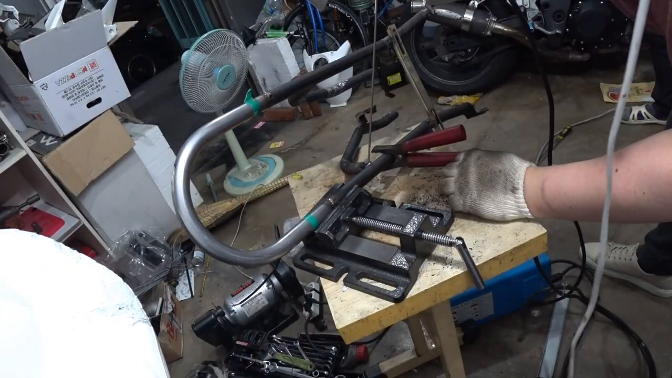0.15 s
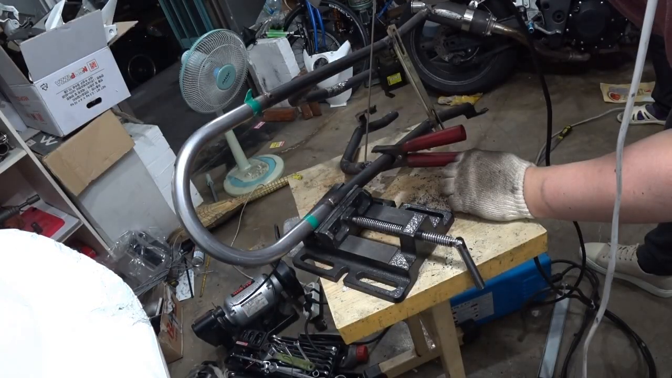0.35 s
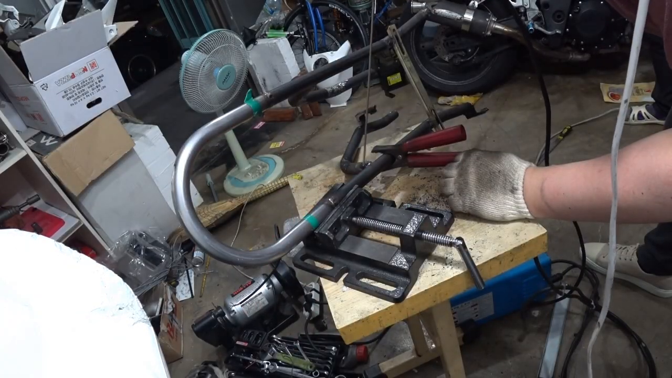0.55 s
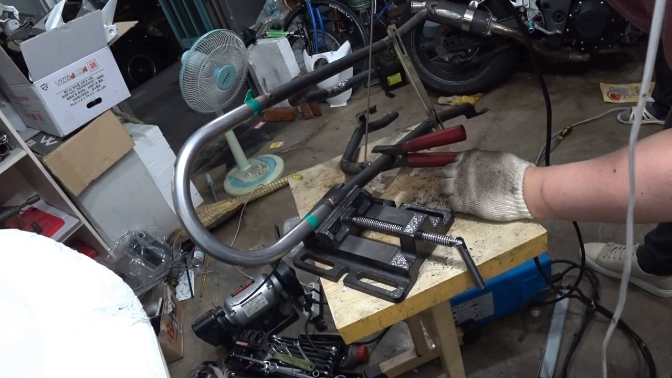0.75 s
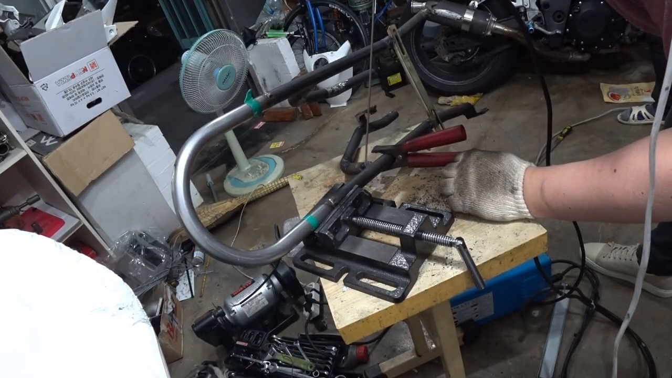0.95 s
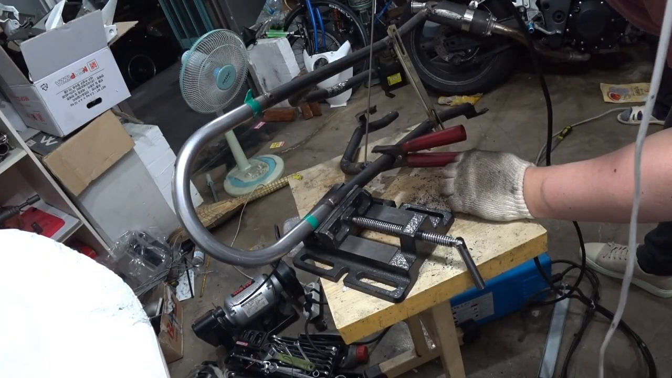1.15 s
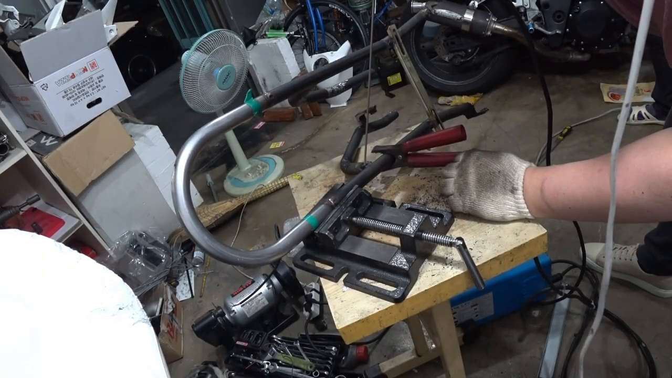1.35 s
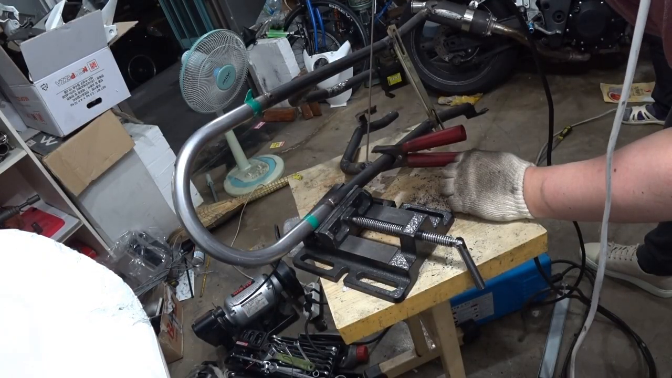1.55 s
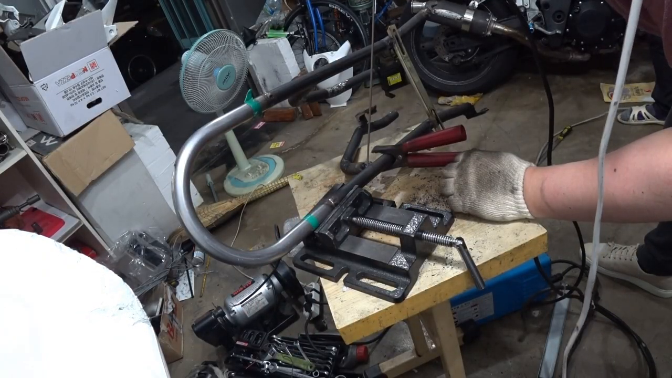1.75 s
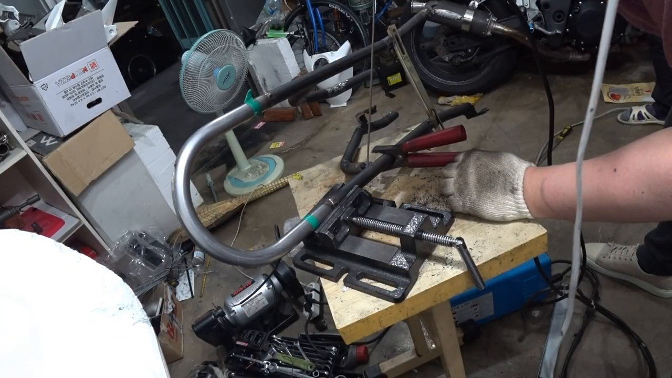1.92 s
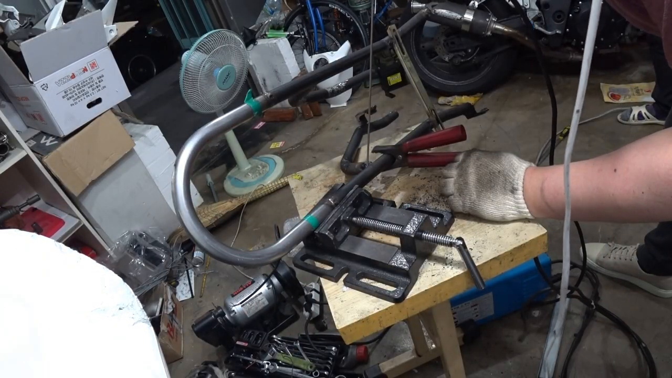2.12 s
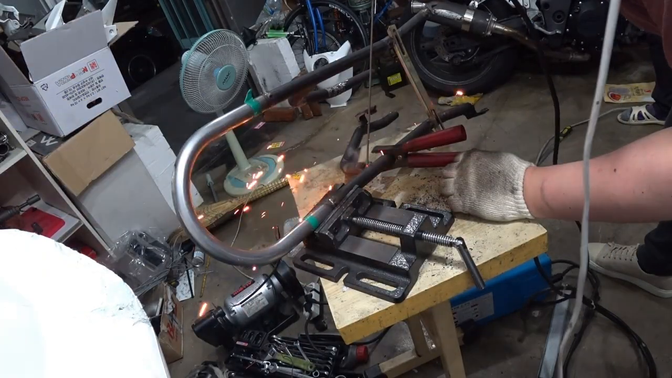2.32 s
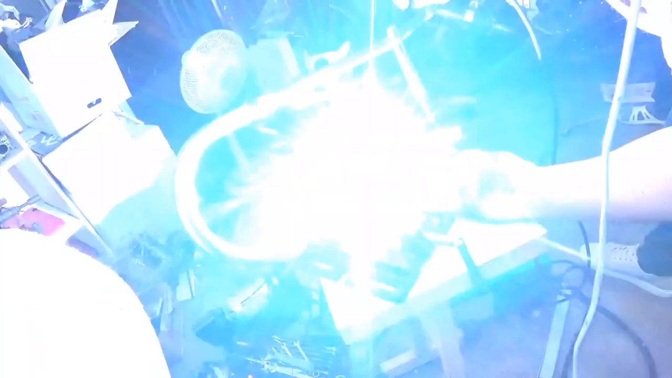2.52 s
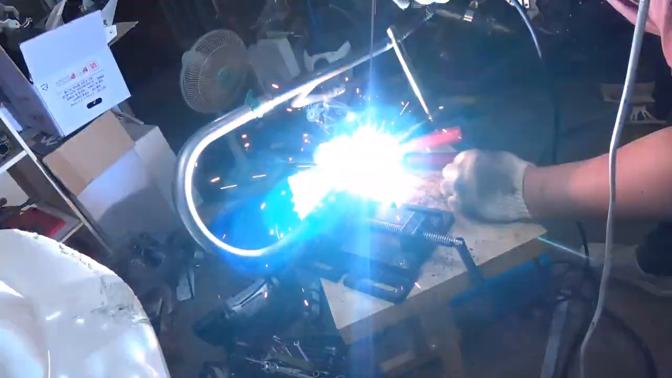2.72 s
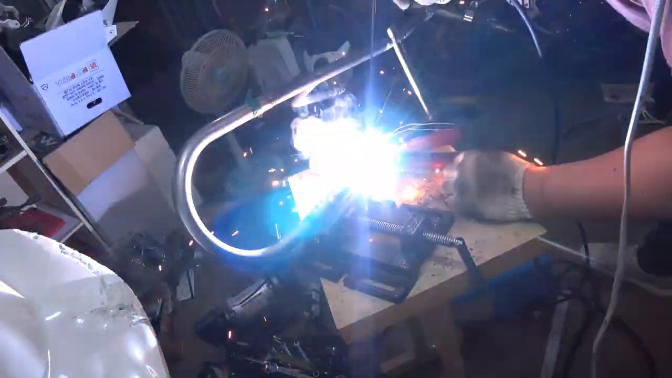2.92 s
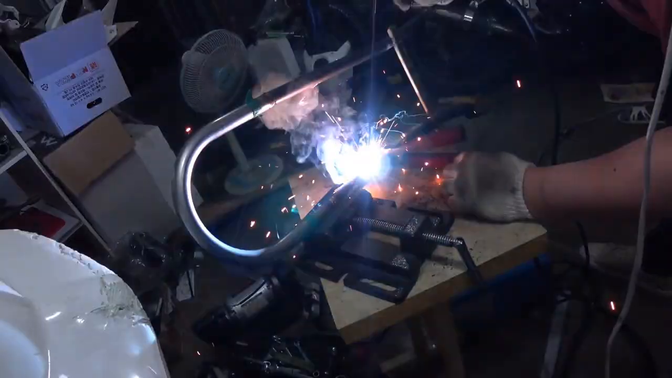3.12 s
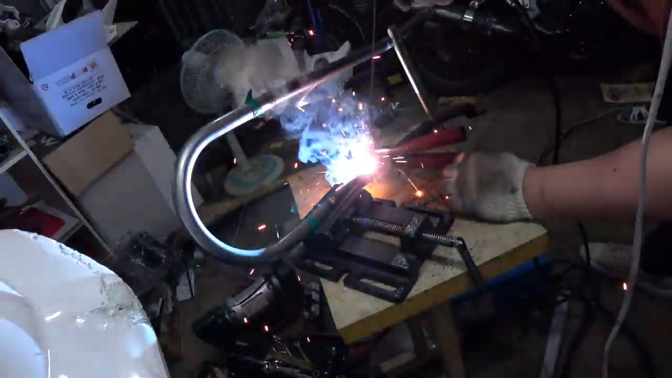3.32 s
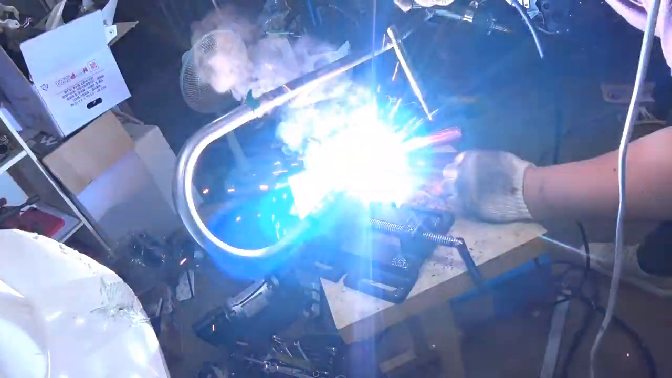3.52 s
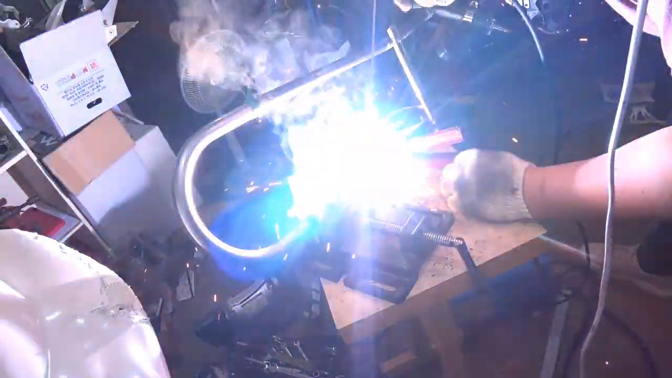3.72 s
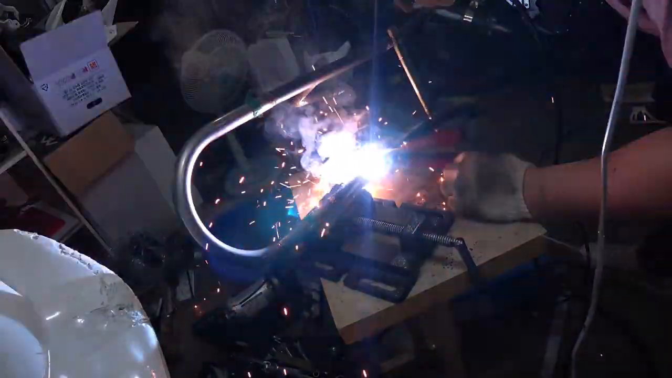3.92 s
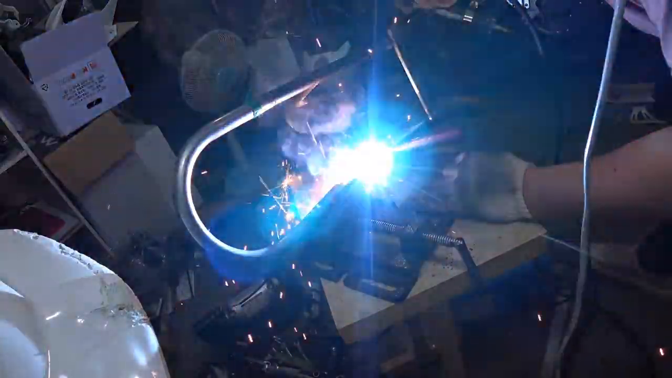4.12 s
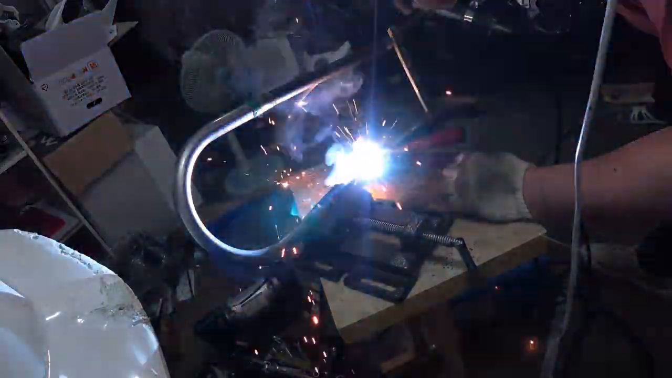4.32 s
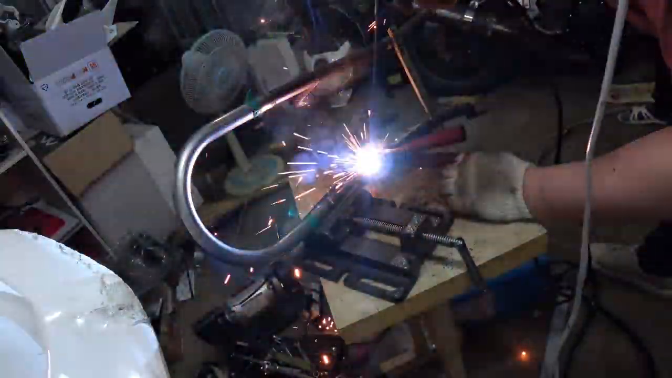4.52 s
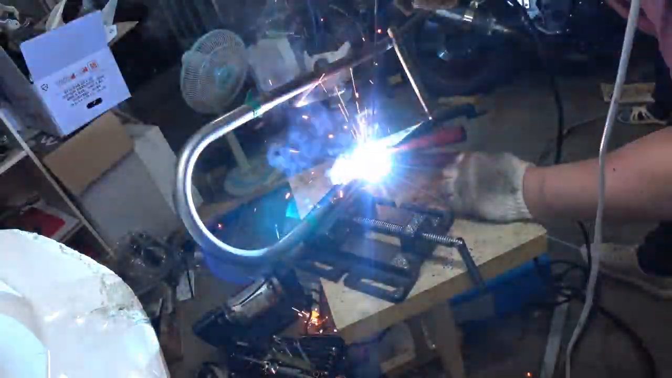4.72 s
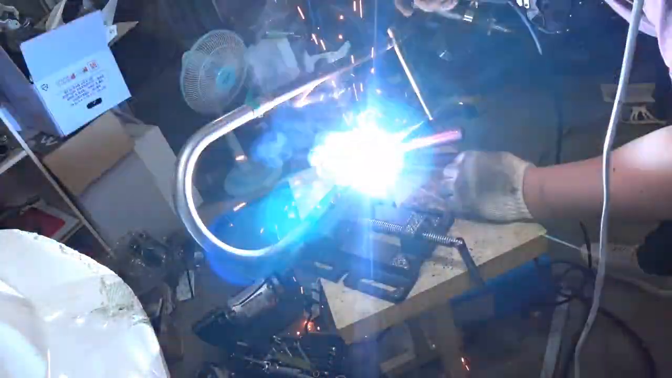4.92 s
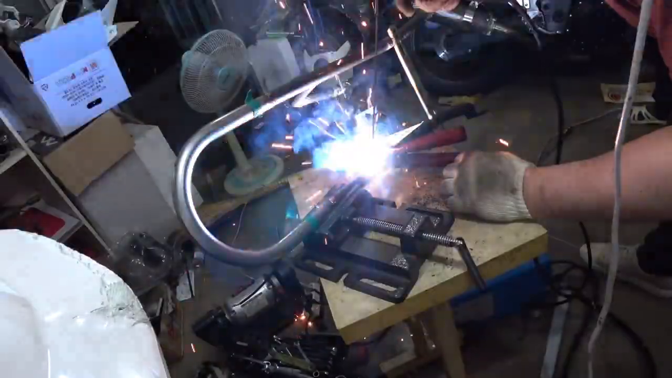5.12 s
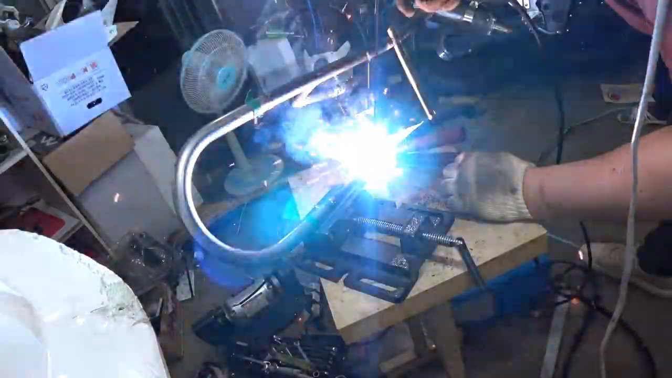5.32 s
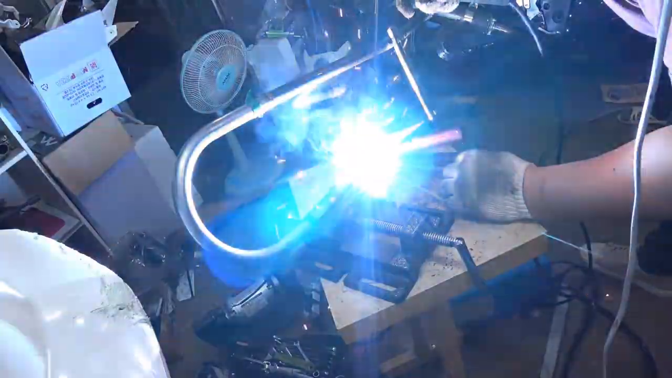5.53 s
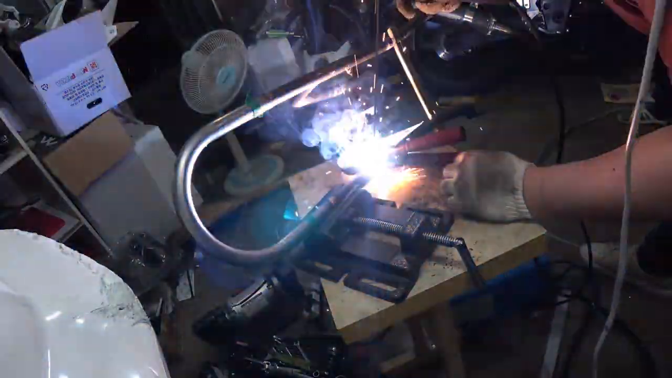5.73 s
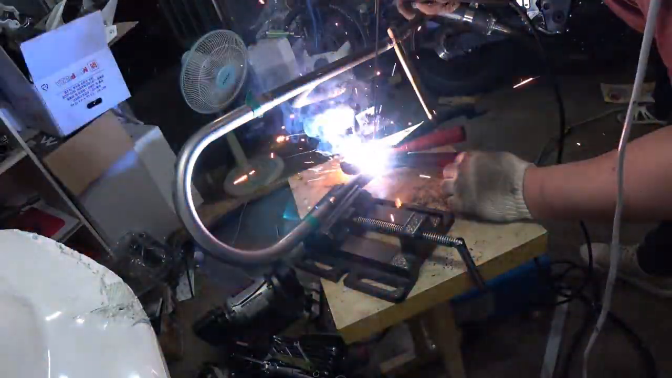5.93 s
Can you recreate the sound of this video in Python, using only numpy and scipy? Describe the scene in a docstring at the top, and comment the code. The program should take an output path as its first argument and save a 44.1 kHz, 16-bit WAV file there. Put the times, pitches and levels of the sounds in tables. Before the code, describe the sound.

A welding rod ticks against steel, then the arc catches and crackles densely in a small workshop, with the welder humming underneath.

```python
"""Stick welding on a steel tube in a small workshop, over the welding machine's fan and hum.
First the rod ticks and scratches on the tube, and rings after one knock. At 2.2 s the arc flashes briefly.
From 2.5 s it burns on: a dense sizzle of tiny sparks, soft pushes of hot gas, and loud snaps where
drops of metal short the gap. Near 4.45 s and 5 s it sputters, relighting in short rasps."""
import sys
import numpy as np
from scipy import signal
from scipy.fft import rfft, irfft
from scipy.io import wavfile

SR = 44100
rng = np.random.default_rng(int(sys.argv[2]) if len(sys.argv) > 2 else 0)


def bounce(signal):
    """Save signal as a 16-bit WAV file at the path given by the first command-line argument."""
    frames = np.transpose(np.atleast_2d(signal))
    limited = np.clip(frames, -1, 1)
    pcm = np.round(limited * 32767).astype(np.int16)
    wavfile.write(sys.argv[1], SR, pcm)


N = 267246
T = np.arange(N) / SR
HZ = np.fft.rfftfreq(N, 1 / SR)


# arc strength, first flash and steady burn: (time [s], sizzle [dB], roar [dB])
ARC_FLASH = [(2.2, -32.5, -51), (2.235, -33.5, -39), (2.272, -29.5, -49)]
ARC_BURN = [(2.5, -30, -44.5), (2.66, -29.5, -38), (2.81, -31.5, -38.5), (2.911, -32, -47),
            (2.98, -30.3, -39), (3.27, -35, -46.3), (3.39, -34, -42), (3.48, -27.3, -44), (3.6, -29.5, -41),
            (3.68, -25, -38), (3.77, -30.5, -37.5), (3.87, -25.5, -36), (3.93, -32.5, -47),
            (4.16, -30, -40), (4.39, -33, -43), (4.53, -31.5, -35.5), (4.65, -35, -48), (4.81, -34, -40.5),
            (4.94, -35, -48), (5.08, -34, -38), (5.21, -34.5, -47), (5.531, -27, -41), (5.74, -34, -41),
            (5.79, -26.5, -38), (5.93, -35.5, -42), (6.06, -31.5, -40.5)]
def sizzle(sparks_per_s=3000, pops_per_s=110, spread_db=3.5, hiss_db=-9.5, flutter_db=3, wander_db=1):
    """Tiny sparks and hiss, clumped by the restless arc, plus small pops; all scaled by its strength."""
    chance, size, noise = rng.random(N), rng.exponential(1, N), rng.standard_normal(N)
    sparks = (chance < sparks_per_s / SR) * amp(spread_db * np.minimum(size, 4)) * np.sign(noise)
    flutter = amp(flutter_db * drift(rate_hz=89))
    hiss = amp(hiss_db) * rng.standard_normal(N)
    roar, mid, fizz = unit_bands(at_weld((unit_rms(sparks) + hiss) * flutter))
    pop_onsets = (chance > 1 - pops_per_s / SR) * (0.5 + rng.random(N))
    pops = signal.lfilter([1], [1, -np.exp(-3000 / SR)], pop_onsets) * noise  # 1/3 ms decay
    _, pop_mid, pop_fizz = unit_bands(at_weld(pops))
    mid = mid + amp(-8.5) * pop_mid
    fizz = fizz + amp(-1.5) * pop_fizz
    flashing = (T >= ARC_FLASH[0][0]) & (T <= ARC_FLASH[-1][0])
    burning = T >= ARC_BURN[0][0]
    out = np.zeros(N)
    for strength, lit in ((ARC_FLASH, flashing), (ARC_BURN, burning)):
        sizzle_db, roar_db, fizz_db = arc_levels(strength)
        out += lit * (amp(roar_db - 2) * roar + amp(sizzle_db - 0.7) * mid + amp(fizz_db) * fizz)
    return out * amp(wander_db * drift(rate_hz=6.9))


SIZZLE_REF_DB, FIZZ_REF_DB = -32, -32.5
# fizz dips (fresh arc, biggest surge, after a sputter): (start [s], recovery [s], depth [dB])
FIZZ_DIPS = [(2.5, 0.22, -8.5), (3.66, 0.12, -5), (5.02, 0.064, -16)]
def arc_levels(strength, fizz_follow=0.54):
    """Sizzle, roar and fizz in dB over time; the fizz follows only part of each surge."""
    times_s, *columns = np.transpose(strength)
    sizzle_db, roar_db = (np.interp(T, times_s, column) for column in columns)
    dip_db = sum(depth_db * (T >= start_s) * np.exp(-((T - start_s) / recovery_s) ** 4)
                 for start_s, recovery_s, depth_db in FIZZ_DIPS)
    return sizzle_db, roar_db, FIZZ_REF_DB + fizz_follow * (sizzle_db - SIZZLE_REF_DB) + dip_db


# dry rod touches: (time [s], level [dB], brightness [dB])
ROD_TOUCHES = [(0.4988, -19, -0.5), (0.8196, -50, -2), (1.1395, -47, -7), (1.2809, -39, -16),
               (1.7878, -22.5, 3), (2.1421, -56, -6)]
# arc strikes and big drops: (time [s], level [dB], brightness [dB])
BIG_SNAPS = [(2.2009, -19, 6), (2.2684, -14.5, 4), (2.3226, -17, 6), (2.4996, -12, -2), (2.6072, -15.5, -7),
             (2.6724, -16, -1), (2.7407, -15, 1), (2.8266, -14, 8), (2.9341, -15.5, 5), (2.9936, -12.5, 3),
             (3.2837, -15, 7), (3.5979, -13.5, 5), (3.8071, -14, 11), (4.2866, -14.5, 8), (4.4128, -15, 8),
             (4.5642, -15, 6), (4.6226, -14, 6), (4.7468, -13.5, 6), (4.9238, -14, 6), (5.0515, -14.5, -2),
             (5.2764, -15, 8), (5.2881, -16, 8), (5.3552, -14.5, 6), (5.4182, -13.5, 4), (5.9228, -13.5, 8)]
def snaps(gain_db=0.7, tilt_db=-1.5):
    """Drops short the gap and burst with a crack; dry touches of the rod crack more cleanly."""
    out = np.zeros(N)
    for rows, scatter in ((ROD_TOUCHES, 0.15), (BIG_SNAPS, 0.9), (small_drops(), 0.9)):
        for time_s, level_db, bright_db in rows:
            add(out, time_s, amp(level_db + gain_db) * crack(bright_db + tilt_db, scatter, 0.0008))
    return at_weld(thin(out, cutoff_hz=2730, body_db=-5))


def small_drops(drops_per_s=26, base_db=-18, base_bright_db=4.5, fizz_follow=0.49, count=200):
    """Rows like BIG_SNAPS: drops at uneven intervals, louder with the fizz, duller as the arc surges."""
    sizzle_db, _, fizz_db = arc_levels(ARC_BURN)
    times_s = ARC_BURN[0][0] + (np.arange(count) + 2 * rng.random(count)) / drops_per_s
    size, tint_db = rng.standard_normal((2, count))
    level_db = base_db + 0.5 * size + fizz_follow * (np.interp(times_s, T, fizz_db) - FIZZ_REF_DB)
    surge_db = np.interp(times_s, T, sizzle_db) - SIZZLE_REF_DB
    bright_db = base_bright_db + tint_db - surge_db
    return [row for row in zip(times_s, level_db, bright_db) if row[0] < T[-1]]


# arc sputters: (start [s], end [s], first rate [Hz], last rate [Hz], level [dB])
SPUTTERS = [(4.443, 4.456, 800, 650, -27), (4.4559, 4.472, 480, 460, -17), (4.4725, 4.489, 570, 1000, -17),
            (5.0115, 5.0145, 900, 900, -14)]
def rasps(gain_db=-2, first_bright_db=-12, dulling_db_per_s=330, jitter=0.076):
    """The arc relights in quick succession: clean cracks at a gliding rate, growing duller."""
    out = np.zeros(N)
    for start_s, end_s, first_hz, last_hz, level_db in SPUTTERS:
        time_s = start_s
        while time_s < end_s:
            bright_db = first_bright_db - dulling_db_per_s * (time_s - start_s)
            gain = amp(level_db + gain_db + rng.standard_normal())
            add(out, time_s, gain * crack(bright_db, scatter=0.13, scatter_s=0.00093))
            rate_hz = np.interp(time_s, [start_s, end_s], [first_hz, last_hz])
            time_s += (1 + jitter * rng.uniform(-1.3, 1)) / rate_hz
    return at_weld(thin(out, cutoff_hz=2770, body_db=-29))


def crack(bright_db, scatter, scatter_s, pivot_hz=8500, size=256):
    """One pressure spike and the splutter after it, with the energy of 1 ms at rms 1."""
    hz, t = np.fft.rfftfreq(size, 1 / SR), T[:size]
    splutter = rng.standard_normal(size) * np.exp(-(t / scatter_s) ** 2) * (t > 0)
    spike = (t == 0) + scatter * splutter / np.linalg.norm(splutter)
    tilt = minimum_phase(0.6 * bright_db * np.tanh((hz - pivot_hz) / 3000))
    out = np.convolve(spike, tilt)
    return out / np.linalg.norm(out) * np.sqrt(SR / 1000)


def thin(x, cutoff_hz, body_db):
    """Very short bursts carry little below the cutoff."""
    return butter(x, 3, cutoff_hz, "high") + amp(body_db) * butter(x, 2, cutoff_hz / 2, "low")


# spark spectrum: (frequency [Hz], level [dB])
SPARK_SPECTRUM = [(30, -51), (130, -30.5), (250, -12), (450, -4.5), (1000, 0), (2400, -4), (3300, -1),
                  (5000, 1.5), (8000, 1), (9000, 0), (11500, 0.5), (14200, -4), (16000, -3)]
# resonances around the weld: (centre [Hz], width [Hz], early gain [dB], late gain [dB])
WELD_RESONANCES = [(680, 720, -2, 4.5), (3560, 540, 5, 4.5), (4800, 870, -0.5, 0.5), (5680, 230, 4, 2.5),
                   (7060, 850, 6, 2), (8100, 870, 4, 2.5), (9856, 1010, 8.5, 8.5), (11210, 1100, 3.5, 4.5),
                   (13020, 1330, 11, 4.5), (14850, 770, 7, 8.5)]
def at_weld(x, size=4096):
    """Tube, vice and rod colour each click; resonances grow in, then shift as the rod burns down."""
    hz = np.fft.rfftfreq(size, 1 / SR)
    centre_hz, width_hz, early_db, late_db = np.transpose(WELD_RESONANCES)
    bumps = 1 / (1 + (2 * (hz[:, None] - centre_hz) / width_hz) ** 4)
    stage = np.interp(T, [2.35, 2.7, 3.9, 5.2], [0.85, 0.9, 1, 2])  # 0 faint, 1 early, 2 late
    out = np.zeros(N)
    for k, gains_db in enumerate((0.15 * early_db, early_db, late_db)):
        response = minimum_phase(curve_at(SPARK_SPECTRUM, hz) + bumps @ gains_db)
        crossfade = np.maximum(1 - abs(stage - k), 0)
        out += crossfade * signal.oaconvolve(x, response)[:N]
    return out


# rod tip scratches: (start [s], length [s], level [dB])
TIP_SCRAPES = [(0.818, 0.008, -51), (1.098, 0.015, -66), (1.132, 0.02, -59), (1.275, 0.017, -51),
               (1.757, 0.016, -51), (1.784, 0.0082, -36.5), (2.138, 0.012, -63.5)]
def scrapes(gain_db=-2.5, grit_db=3.5, body_db=9, body_hz=3000):
    """The tip catches and slides over scale: gritty, fading bursts, duller than a spark."""
    out = np.zeros(N)
    grit = unit_rms(rng.standard_normal(N) * amp(grit_db * drift(rate_hz=670)))
    for start_s, length_s, level_db in TIP_SCRAPES:
        age = np.maximum(T - start_s, 0) / length_s
        envelope = np.minimum(age * 10, 1) * np.exp(-age ** 2)
        out += amp(level_db + gain_db) * envelope * grit
    return at_weld(out + amp(body_db) * butter(out, 1, body_hz, "low"))


def rod_ping(start_s=1.788, pitch_hz=2270, level_db=-41.5, t60_s=0.12):
    """The rod rings briefly after knocking on the tube."""
    out, t = np.zeros(N), T[:8000]
    add(out, start_s, amp(level_db - 60 * t / t60_s) * np.sin(2 * np.pi * pitch_hz * t))
    return out


# pushes of hot gas: (time [s], level [dB])
GAS_PUFFS = [(2.499, -40.5), (2.679, -53), (2.827, -46), (2.991, -52), (3.596, -51), (3.81, -49),
             (4.409, -54), (4.6, -53), (5.911, -52)]
def puffs(swell_s=0.0012):
    """Hot gas swells and falls back: one low push each."""
    out, age = np.zeros(N), T[:2000] / swell_s
    push = 2 * age * (2 - age) * np.exp(-age)
    for time_s, level_db in GAS_PUFFS:
        add(out, time_s, amp(level_db) * push)
    return out


def workshop(x, wet_db=-4, floor_db=-20.5, floor_delay_s=0.0093, tails=5):
    """Direct sound, a floor echo and short, randomly crossfaded stereo tails: a smooth small room."""
    mid, side = x.copy(), np.zeros(N)
    add(mid, floor_delay_s, amp(floor_db) * x)
    weights = np.array([drift(rate_hz=9) for _ in range(tails)])
    for weight in weights / np.linalg.norm(weights, axis=0):
        wet = amp(wet_db) * signal.oaconvolve((weight * x)[None], room_tail(), axes=1)[:, :N]
        mid, side = mid + wet[0], side + wet[1]
    return np.array([mid + side, mid - side])


# room decay: (frequency [Hz], T60 [s])
ROOM_DECAY = [(200, 0.21), (2500, 0.45), (6600, 0.27), (11000, 0.2), (16000, 0.17)]
# room width: (frequency [Hz], side over mid [dB])
ROOM_WIDTH = [(100, -29), (500, -31), (1200, -14), (2200, -8), (4000, -11.5), (8000, -13.5), (16000, -7.5)]
def room_tail(density=0.2, onset_s=0.002, size=22050):
    """Sparse reflections that die faster in the treble: a mid and a weaker side response."""
    taps = np.sign(rng.standard_normal((2, size))) * (rng.random((2, size)) < density)
    taps *= 1 - np.exp(-T[:size] / onset_s)
    hz, age_s, spectra = signal.stft(taps, SR, nperseg=256)
    spectra *= amp(-60 * age_s / curve_at(ROOM_DECAY, hz)[:, None])
    spectra[1] *= amp(curve_at(ROOM_WIDTH, hz))[:, None]
    response = signal.istft(spectra, SR, nperseg=256)[1]
    return response / np.linalg.norm(response[0])


# fan air: (frequency [Hz], relative density [dB])
FAN_SPECTRUM = [(30, -59), (100, -28.5), (190, -23), (280, -13.5), (340, -5.5), (490, -1), (720, -6.5),
                (1100, -6), (1350, -11), (2000, -11.5), (3000, -18), (5000, -23), (8000, -29.5),
                (16000, -40)]
# fan width: (frequency [Hz], side over mid [dB])
FAN_WIDTH = [(60, -12), (180, -24), (550, -13), (1650, -6), (4970, -7.5), (15000, -14)]
def fan(level_db=-46, swell_db=0.54):
    """Air rushes through the machine's fan: stereo noise whose level wavers slightly."""
    spectra = rfft(rng.standard_normal((2, N))) * amp(curve_at(FAN_SPECTRUM, HZ))
    mid = irfft(spectra[0], N)
    side = irfft(spectra[1] * amp(curve_at(FAN_WIDTH, HZ)), N)
    gain = amp(level_db - swell_db * drift(rate_hz=4.4))
    return gain * np.array([mid + side, mid - side]) / mid.std()


# mains hum, then casing tones: (frequency [Hz], level [dB])
HUM_TONES = [(253, -63), (334, -60.5), (410, -65.5), (447, -57.5), (496, -56), (612, -56), (845, -60),
             (1093, -64)]
def hum(mains_waver_hz=1, casing_waver_hz=5.34, flicker=0.34):
    """The machine hums at a near-steady pitch; its casing tones waver more. All flicker in level."""
    out = np.zeros(N)
    for k, (hz, level_db) in enumerate(HUM_TONES):
        waver_hz = casing_waver_hz if k else mains_waver_hz
        cycles = np.cumsum(hz + waver_hz * drift(rate_hz=15.54)) / SR
        gain = amp(level_db) * (1 + flicker * drift(rate_hz=16))
        out += gain * np.sqrt(2) * np.sin(2 * np.pi * cycles)
    return out


def amp(db):
    """Decibels to gain."""
    return 10 ** (np.asarray(db) / 20)


def unit_rms(x):
    """Scaled to rms 1."""
    return x / np.sqrt(np.mean(x ** 2) + 1e-20)


def curve_at(points, hz):
    """Interpolates on a log-frequency axis."""
    points_hz, values = np.transpose(points)
    return np.interp(np.log(hz + 1), np.log(points_hz), values)


def add(mix, start_s, sound):
    """Mixes a sound in, in place."""
    part = mix[round(start_s * SR):][:len(sound)]
    part += sound[:len(part)]


def drift(rate_hz):
    """Random wander below rate_hz, rms 1."""
    return unit_rms(irfft(rfft(rng.standard_normal(N)) / (1 + (HZ / rate_hz) ** 4), N))


def butter(x, order, edges_hz, kind):
    """Flat-passband filter."""
    return signal.sosfilt(signal.butter(order, edges_hz, kind, fs=SR, output="sos"), x)


def unit_bands(x):
    """Roar, sizzle and fizz bands, each at rms 1."""
    bands_hz = ([10, 2500], [2500, 8500], [8500, 20000])
    return [unit_rms(butter(x, 3, edges_hz, "band")) for edges_hz in bands_hz]


def minimum_phase(gains_db, size=2048):
    """The quickest impulse response of this spectral shape, energy 1."""
    log_gain = np.log(amp(np.r_[gains_db, gains_db[-2:0:-1]]))
    taps = np.fft.ifft(np.exp(signal.hilbert(log_gain).conj())).real[:size]
    return taps / np.linalg.norm(taps)


def scene():
    """Arc and rod in the workshop, over the running machine."""
    return fan() + hum() + puffs() + rod_ping() + workshop(sizzle() + scrapes() + rasps() + snaps())


def record(dry, cutoff_hz=15800):
    """Rounds off the tallest spikes, then limits the band."""
    lowpass = signal.firwin(401, cutoff_hz, window=("kaiser", 8), fs=SR)
    return signal.oaconvolve(np.tanh(dry), lowpass[None], "same")


dry = scene()
out = record(dry)
bounce(out)
```